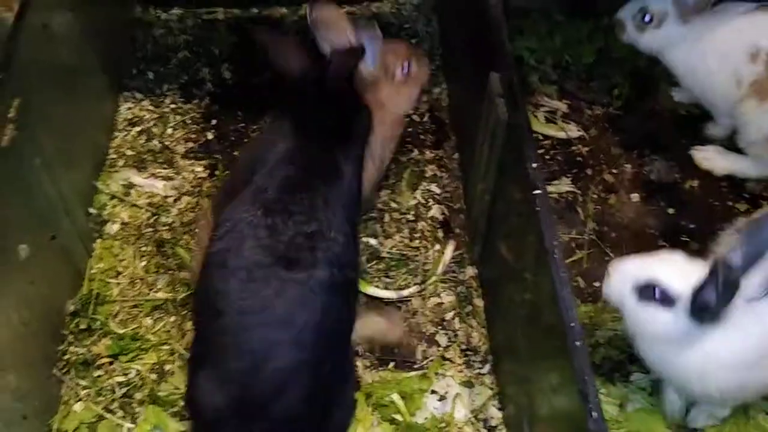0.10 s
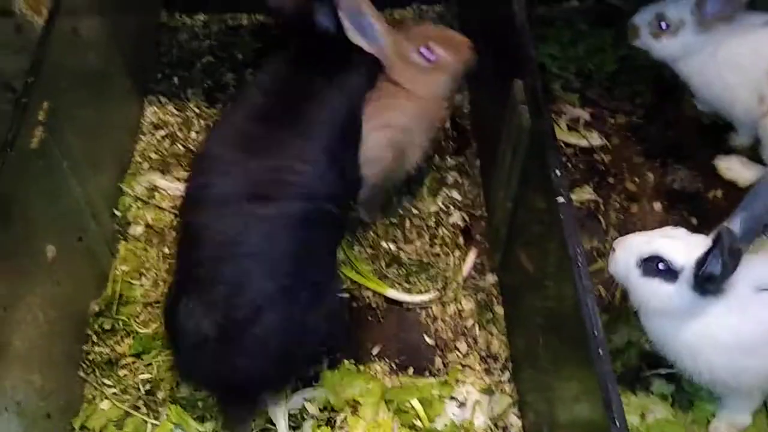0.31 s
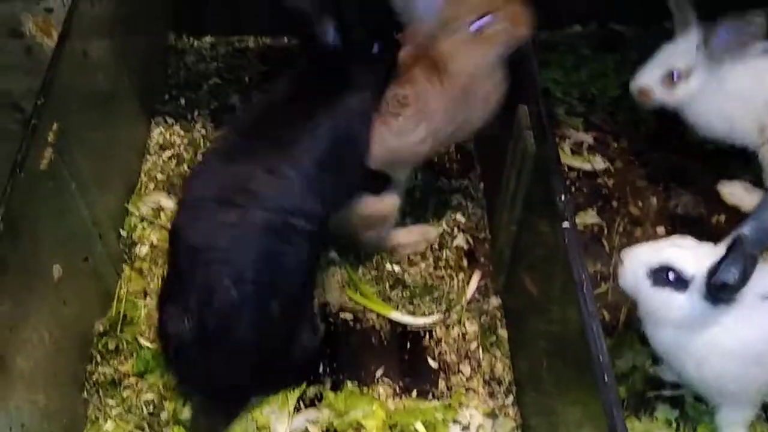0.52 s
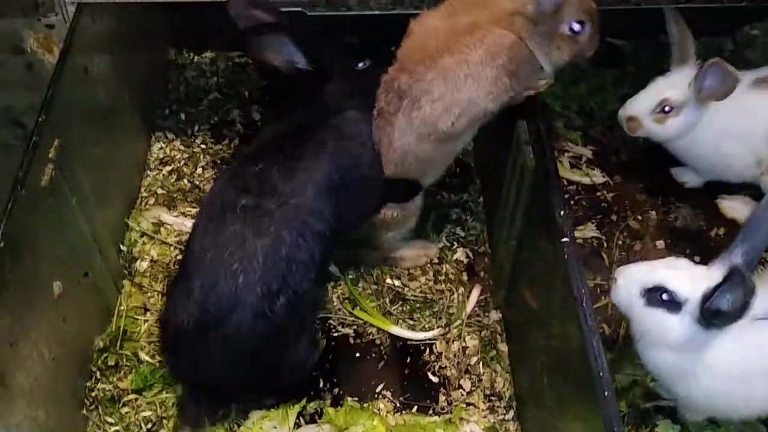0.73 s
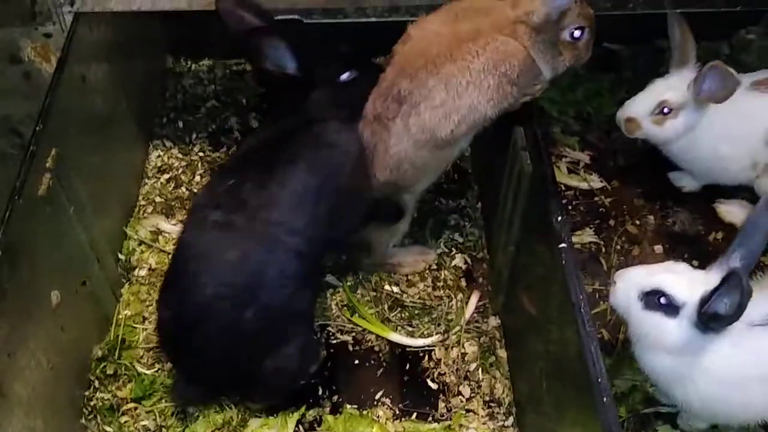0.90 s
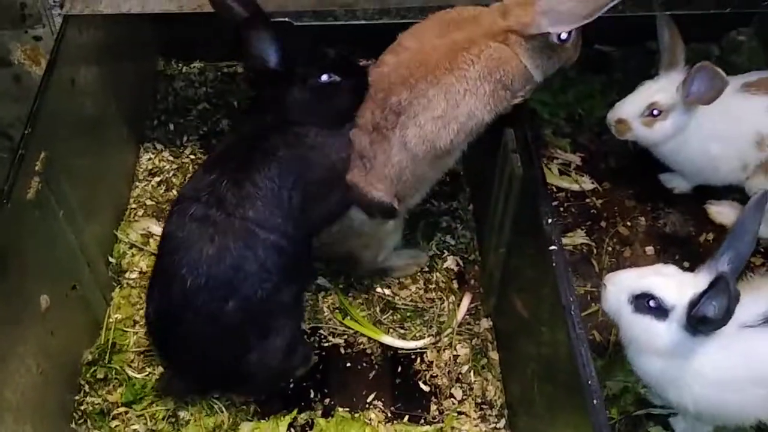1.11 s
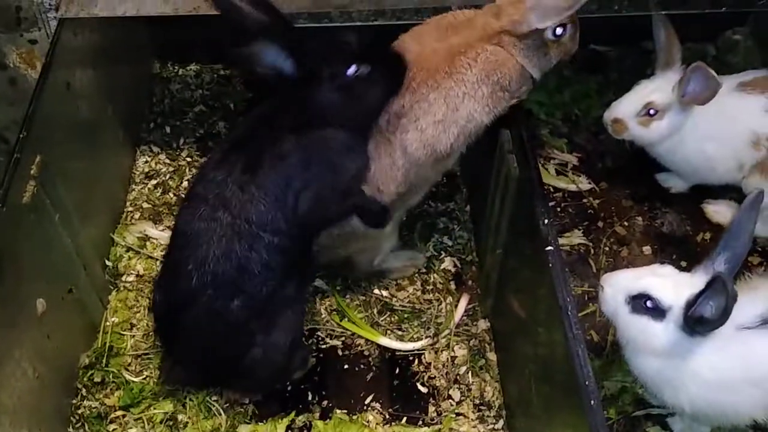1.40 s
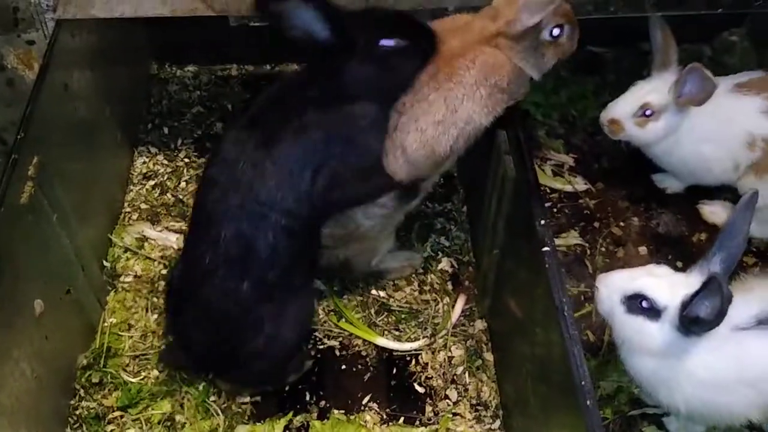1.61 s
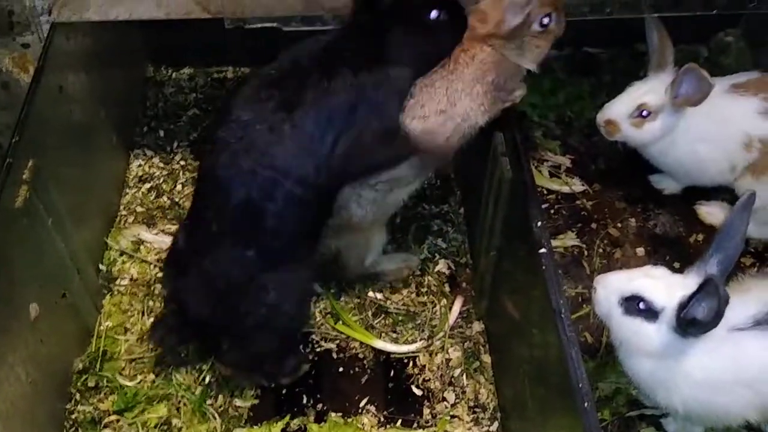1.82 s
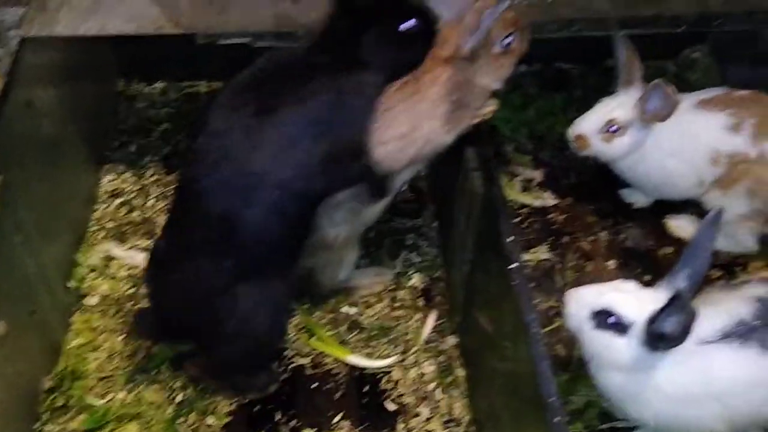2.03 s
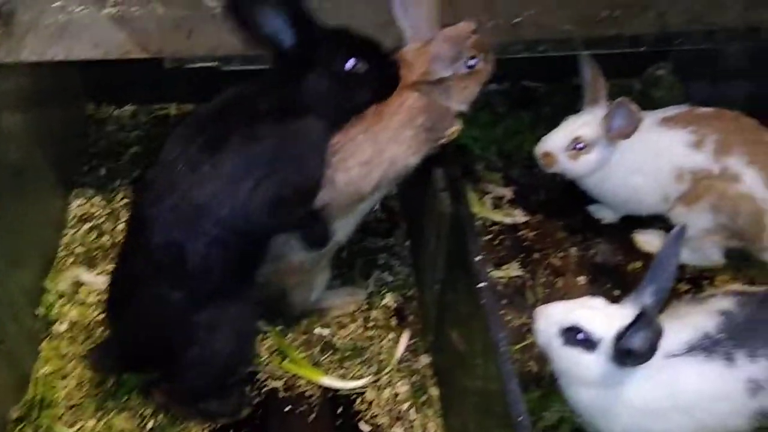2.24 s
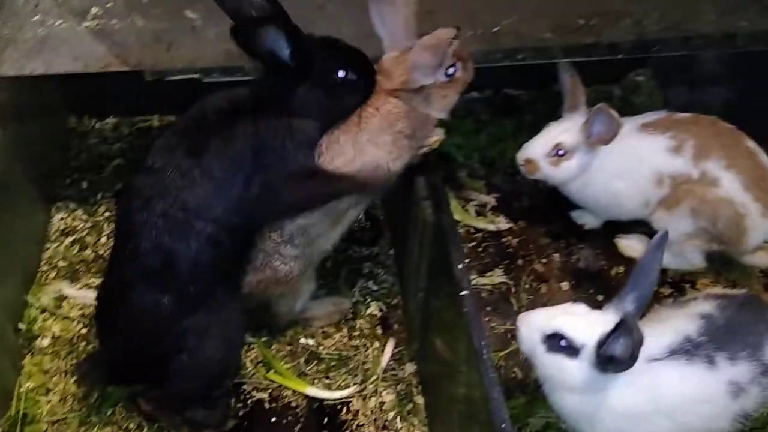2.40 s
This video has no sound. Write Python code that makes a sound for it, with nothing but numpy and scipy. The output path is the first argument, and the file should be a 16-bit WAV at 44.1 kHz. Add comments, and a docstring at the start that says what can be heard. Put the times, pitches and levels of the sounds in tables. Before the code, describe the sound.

Close up in a small wooden shed, rabbit paws thump on hollow boards and scrabble through dry shavings, fade to a quiet low rumble, then a sudden bright crack with short echoes, followed by a dull thump.

```python
"""A wooden hutch inside a small shed, where rabbits shift about.
Their paws thump on the hollow floor, which rings as a set of modes, and scuff through wood shavings,
made of random grains; claws tick on the boards. After a still second something snaps sharply on the
left, perhaps a claw slipping off a board, and a paw lands. The snap is a noise burst with echoes and
ringing. Low rumble, a sinking hush and faint narrow resonances, all filtered noise, lie underneath."""
import sys
import numpy as np
from scipy import signal
from scipy.io import wavfile

SR = 44100
rng = np.random.default_rng(int(sys.argv[2]) if len(sys.argv) > 2 else 0)


def wrap_up_sound(samples):
    """Save the sound to the file named by the first command line argument, as 16-bit audio."""
    columns = np.atleast_2d(samples).T
    # keep every value between -1 and 1, then stretch to whole-number steps
    tamed = np.clip(columns, -1, 1)
    steps = np.round(tamed * 32767).astype(np.int16)
    wavfile.write(sys.argv[1], SR, steps)


N = 114660  # samples, 2.6 s
SNAP_S = 2.1073

# how far the sound leans to the left at each pitch: (pitch_hz, left_minus_right_db)
LEFT_LEAN = [(100, 1.96), (300, -8.5), (1000, 0.5), (2500, -2.5), (5500, 4.5), (10000, 8), (15000, 11)]


def from_db(db):
    """Decibels to gain."""
    return 10 ** (np.asarray(db) / 20)


def rms_one(x):
    """Scale to unit rms over all channels together."""
    return x / np.sqrt(np.mean(x ** 2) + 1e-20)


def energy_one(x):
    """Scale to an energy of one per channel, averaged over the channels."""
    return rms_one(x) / np.sqrt(x.shape[-1])


def at_hz(points, hz):
    """Read a table between its points, on a log-frequency axis."""
    table_hz, values = np.transpose(points)
    return np.interp(np.log(hz), np.log(table_hz), values)


def pan(db):
    """Left and right gains of constant power; positive dB leans left."""
    return rms_one(from_db(np.array([[db], [-db]]) / 2))


def clicks(times, gains):
    """A track of single impulses."""
    out = np.zeros(N)
    places = np.clip(np.asarray(times) * SR, 0, N - 1).astype(int)
    np.add.at(out, places, gains)
    return out


def through(x, response):
    """Play a track through a stereo response."""
    return signal.fftconvolve(np.atleast_2d(x), response, axes=1)[:, :N]


def band_filter(hz, width_hz):
    """A filter that passes a narrow band around one pitch."""
    edges = [hz - width_hz / 2, hz + width_hz / 2]
    return signal.butter(2, edges, "band", fs=SR, output="sos")


def ring(x, hz, t60):
    """One mode: a unit click sets a sine of height 1 ringing, which falls 60 dB in t60 seconds."""
    shrink = from_db(-60 / (t60 * SR))  # per sample
    turn = 2 * np.pi * hz / SR  # radians per sample
    return signal.lfilter([0, np.sin(turn)], [1, -2 * shrink * np.cos(turn), shrink * shrink], x + 1e-18)


def noise_bands(size):
    """Stereo noise in narrow bands, much alike left and right in the bass and unrelated at the top."""
    # likeness of the two channels, 1 = the same: (pitch_hz, likeness)
    likeness = [(30, .93), (150, 0.92), (350, .88), (700, 0.37), (1300, -0.14), (2800, -0.15), (6000, 0),
                (15000, 0)]
    edges = np.geomspace(18, 17000, 31)
    white = rng.standard_normal((2, 2, size + SR // 2))
    for k, (low, high) in enumerate(zip(edges, edges[1:])):
        band = signal.butter(2, [low, high], "band", fs=SR, output="sos")
        # the first half second is dropped while the filter settles
        mid, side = signal.sosfilt(band, white[k % 2])[:, -size:]
        hz = np.sqrt(low * high)
        alike = np.clip(at_hz(likeness, hz), -.99, .99)
        yield hz, np.sqrt(1 + alike) * mid + np.sqrt(1 - alike) * side * [[1], [-1]]


def steady(spectrum):
    """Coloured stereo noise of unit rms, summed from weighted bands."""
    return rms_one(sum(from_db(at_hz(spectrum, hz)) * band for hz, band in noise_bands(size=N)))


def shed(spectrum, lean):
    """The shed's answer to a click of this colour: dense echoes that die fast, plus a weak late tail."""
    # time to fall by 60 dB: (pitch_hz, t60_s)
    shed_t60 = [(100, 0.53), (500, 0.68), (1100, .3), (2200, 0.24), (6000, 0.15), (11000, .17),
                (15000, 0.27)]
    build_s, late_db, late_t60_s = 0.002, -26, 0.52
    t = np.arange(SR // 2) / SR
    out = 0
    for hz, band in noise_bands(size=len(t)):
        early = from_db(-60 * t / at_hz(shed_t60, hz))
        late = from_db(late_db - 60 * t / late_t60_s)
        out = out + from_db(at_hz(spectrum, hz)) * pan(at_hz(lean, hz)) * band * (early + late)
    return energy_one(out * (1 - np.exp(-t / build_s)))


def crack(spectrum, lean_db):
    """The direct sound of one tiny fracture, arriving from the left; too small to make bass."""
    fall_s, low_cut_hz = .0006, 1800
    t = np.arange(SR // 20) / SR
    noise = sum(from_db(at_hz(spectrum, hz)) * band for hz, band in noise_bands(size=len(t)))
    burst = noise * np.exp(-t / fall_s)
    burst = signal.sosfilt(signal.butter(2, low_cut_hz, "high", fs=SR, output="sos"), burst)
    return np.array([energy_one(side) for side in burst]) * pan(lean_db)


def thumps():
    """Soft paws ring the floor's modes and knock dully on the walls; the small floor gives little deep bass."""
    # paws land; the spot decides which modes answer:
    # (start_s, lowest_mode_db, main_mode_db, upper_modes_db)
    landings = [(0.013, -54, -48, -43), (0.066, -53, -52, -43), (0.195, -46, -32, -31.5),
                (0.2183, -24, -22, -19.5), (0.275, -64, -61, -40), (0.492, -38, -40, -27),
                (0.5077, -37, -26.5, -35), (0.568, -50, -43, -38.5), (0.582, -34, -29, -23),
                (0.597, -61, -27, -26), (0.771, -31, -46.5, -45), (0.803, -31, -52, -44),
                (0.957, -33.5, -38, -42.5), (0.994, -68, -55, -53), (2.1559, -18, -21.5, -28.5),
                (2.187, -29.5, -30.5, -31)]
    # pitches where those three levels apply, in between they blend: pitch_hz
    group_hz = [111, 140, 209]
    # the hutch floor: (pitch_hz, level_db, t60_s)
    floor_modes = [(111.2, -5, 0.51), (139.8, 0, 0.31), (156.4, -7.5, 0.38), (191, -8.5, 0.34),
                   (211.6, -3, 0.18), (219.7, -17.5, 0.34), (302.4, -21.5, 0.044), (358.7, -31.5, 0.39),
                   (467.5, -22, 0.08), (497.4, -20.5, 0.23)]
    # colour of the dull knock of the walls: (pitch_hz, level_db_per_hz)
    knock_colour = [(60, -15), (120, 8), (250, 5.5), (400, -8), (700, -7.5), (1100, 3.5), (1800, -42),
                    (4000, -30.5)]
    knock_db = 11.5  # above the upper modes' level
    paw_soft_hz, floor_low_cut_hz = 454, 140

    start_s, *groups = np.transpose(landings)
    boards = 0
    for k, (hz, db, t60) in enumerate(floor_modes):
        strengths = [at_hz(list(zip(group_hz, row)), hz) for row in np.transpose(groups)]
        sign = (-1) ** (k // 2)  # the modes do not all push the same way
        boards = boards + sign * ring(clicks(start_s, from_db(np.add(strengths, db))), hz, t60)
    knock = through(clicks(start_s, from_db(groups[-1] + knock_db)), shed(knock_colour, LEFT_LEAN))
    soft = signal.butter(2, paw_soft_hz, fs=SR, output="sos")
    thin = signal.butter(2, floor_low_cut_hz, "high", fs=SR, output="sos")
    return signal.sosfilt(np.vstack([soft, thin]), boards * pan(LEFT_LEAN[0][1]) + knock)


def grains():
    """A random stream of breaking and slipping shavings: clicks of random size and sign."""
    grains_per_s, spread_db = 3200, 4.0
    sizes = from_db(spread_db * np.minimum(rng.exponential(1, N), 4))
    signs = rng.choice([-1, 1], N)
    return sizes * signs * (rng.random(N) < grains_per_s / SR)


def scuffs():
    """Each push swells and fades: bright grains from the shavings, duller ones from the boards beneath."""
    # paws push through the shavings: (start_s, rise_s, crackle_db, rub_on_the_boards_db)
    pushes = [(0.0, 0.0037, -56.5, -43.5), (0.017, 0.0093, -61, -54), (0.057, 0.0042, -55, -64),
              (0.10, 0.036, -71, -70), (0.162, 0.0021, -57, -79), (0.186, 0.0073, -52, -44.5),
              (0.209, 0.002, -65, -42.5), (0.238, 0.0081, -57, -51), (0.275, 0.0094, -50.5, -45.5),
              (0.302, 0.02, -57.5, -81), (0.356, 0.0019, -42.5, -63), (0.384, 0.0021, -58, -43.5),
              (0.409, 0.017, -60.5, -57), (0.447, 0.0056, -57, -45.5), (0.479, 0.0017, -37, -39),
              (0.512, 0.024, -67, -67), (0.5717, .0008, -45.5, -80), (0.586, 0.0055, -65, -46.5),
              (0.619, 0.01, -64.5, -69), (0.658, 0.011, -68, -60), (0.726, 0.013, -64, -90),
              (0.775, 0.0065, -67.5, -62.5), (0.83, 0.036, -77.5, -92), (0.917, 0.0027, -57.5, -69),
              (0.943, 0.0045, -55, -56.5), (0.981, 0.017, -73.5, -86)]
    # colour of the crackling shavings: (pitch_hz, level_db_per_hz)
    crackle_colour = [(500, -21), (1500, -4), (3000, -4.5), (5500, -4.5), (8800, -1), (12000, 0.5),
                      (15000, -9)]
    # colour of the rub on the boards: (pitch_hz, level_db_per_hz)
    rub_colour = [(150, 14), (400, -24), (750, -4), (1250, 1), (2100, -8.5), (3200, -11.5), (6000, -12.5),
                  (15000, -49)]
    direct_db, direct_lean_db = -4, 2.5

    t = np.arange(N) / SR
    shavings, boards = grains(), grains()
    crackle, rub = 0, 0
    for start_s, rise_s, crackle_db, rub_db in pushes:
        age = np.maximum(t - start_s, 0) / rise_s
        push = age * np.exp(1 - age)  # peaks at 1 after the rise time
        size = np.linalg.norm(push)  # longer pushes carry more energy
        crackle = crackle + from_db(crackle_db) * size * energy_one(shavings * push)
        rub = rub + from_db(rub_db) * size * energy_one(boards * push)
    direct = from_db(direct_db) * through(crackle, crack(crackle_colour, direct_lean_db))
    echoes = through(crackle, shed(crackle_colour, LEFT_LEAN))
    return direct + echoes + through(rub, shed(rub_colour, LEFT_LEAN))


def snap():
    """One hard snap: the crack and its near echoes, the shed's answer, and thin ringing."""
    # the snap and its nearest echoes off the boards: (delay_s, level_db)
    paths = [(0.0003, 0), (.0018, -4), (.0026, -2), (.0075, -6)]
    # colour of the direct crack: (pitch_hz, level_db_per_hz)
    crack_colour = [(1000, -28.5), (3000, -17), (6000, -14), (8300, -6.5), (11000, 2), (13000, 2),
                    (15000, -6)]
    # colour of the shed's answer: (pitch_hz, level_db_per_hz)
    body_colour = [(100, -34.5), (450, -15), (800, -20.5), (1100, -8.5), (1450, -7), (2200, 2.5),
                   (3000, -1), (4500, 0.5), (6500, -1.5), (8400, 1), (10800, -1), (13000, -5.5),
                   (15000, -18)]
    # lean of the snap's echoes and ringing: (pitch_hz, left_minus_right_db)
    echo_lean = [(300, 0.5), (1000, -2.5), (2500, 0), (4000, 1), (5800, 5.5), (8400, 6.5), (10500, 7.5),
                 (15000, -0.5)]
    # thin ringing set off by the snap: (pitch_hz, level_db, t60_s)
    thin_rings = [(969, -65, .28), (1414, -65.5, 0.08), (1860, -65.5, .65), (2110, -40, 0.16),
                  (2364, -39, 0.22), (6020, -39.5, 0.2), (6480, -43, .17), (8140, -40.5, .24),
                  (8400, -44.5, .15), (9770, -43.5, .13), (10640, -32, .13), (11300, -37, .13)]
    direct_db, direct_lean_db, ring_delay_s = -4, 14, .01

    delay_s, path_db = np.transpose(paths)
    arrivals = energy_one(clicks(SNAP_S + delay_s, from_db(path_db)))
    direct = from_db(direct_db) * through(arrivals, crack(crack_colour, direct_lean_db))
    hit = clicks([SNAP_S], 0.85 * from_db(2))
    answer = through(hit, shed(body_colour, echo_lean))
    rings = 0
    for hz, db, t60 in thin_rings:
        starts = SNAP_S + rng.uniform(0, ring_delay_s, 2)  # one for each ear
        pair = np.array([ring(clicks([s], 1), hz, t60) for s in starts])
        rings = rings + from_db(db) * pan(at_hz(echo_lean, hz)) * pair
    return direct + answer + rings


def cluster():
    """Many close modes beat as they die away after the snap: a narrow band of noise that fades."""
    hz, width_hz, level_db, t60_s = 1125, 90, -52, .56
    age = np.arange(N) / SR - SNAP_S
    fade = (age > 0) * from_db(-60 * np.maximum(age, 0) / t60_s)
    hum = rms_one(signal.sosfilt(band_filter(hz, width_hz), rng.standard_normal((2, N))))
    return from_db(level_db) * fade * hum


def taps():
    """Claws tick on a wall board; each mode reaches the two ears at slightly different moments."""
    # claws catch on the boards: (start_s, level_db)
    catches = [(0.215, -53), (0.290, -63), (0.3855, -46), (0.390, -50.5), (0.582, -60.5)]
    # a wall board: (pitch_hz, level_db, t60_s)
    board_modes = [(530, -6, .1), (750, 0, .13), (1020, -3, .09), (1280, 0, .08), (1700, -2, .07),
                   (2100, 0, .07), (2400, -3, .06)]
    start_s, tap_db = np.transpose(catches)
    out = 0
    for hz, mode_db, t60 in board_modes:
        lags = rng.random(2) / hz  # up to one cycle late
        gains = from_db(tap_db + mode_db)
        out = out + np.array([ring(clicks(start_s + lag, gains), hz, t60) for lag in lags])
    return out


def background():
    """Filtered noise: low rumble, a hush that sinks, and faint narrow resonances that come and go."""
    # colour of the rumble: (pitch_hz, level_db_per_hz)
    rumble_colour = [(20, -0.5), (40, -1.5), (65, 0.5), (95, -4.5), (140, -3), (210, -11.5), (300, -20),
                     (500, -32), (800, -71), (1300, -41), (2200, -46), (5000, -50.5), (15000, -51)]
    # a faint midrange hush that sinks in level over time: (time_s, level_db)
    hush_level = [(0, -58), (.8, -61.5), (1.1, -64), (1.3, -72.5), (1.55, -70), (1.75, -88.5), (2.4, -90.5),
                  (2.6, -84)]
    # colour of the hush: (pitch_hz, level_db_per_hz)
    hush_colour = [(100, 9), (300, 6.5), (500, 1), (800, -10), (1200, -11), (1600, -16.5), (2400, -14),
                   (3500, -36.5), (15000, -31.5)]
    # faint narrow resonances: (middle_s, length_s, pitch_hz, level_db)
    sings = [(0.795, 0.082, 1223, -68.5), (1.012, 0.28, 1530, -77.5), (1.252, 0.079, 1134, -77),
             (1.247, 0.28, 1490, -83.5), (1.256, 0.17, 2470, -87.5), (1.439, 0.051, 1510, -77.5),
             (1.548, 0.15, 1540, -81), (1.632, .11, 1140, -81.5), (2.021, 0.027, 1220, -74.5),
             (1.15, 0.17, 532, -72.5), (2.057, 0.093, 499, -75), (2.577, 0.089, 387, -74)]
    rumble_db, rumble_lean_db, sing_width_hz = -56.5, 1.1, 120

    t = np.arange(N) / SR
    rumble = from_db(rumble_db) * steady(rumble_colour) * pan(rumble_lean_db)
    hush = from_db(np.interp(t, *np.transpose(hush_level))) * steady(hush_colour)
    out = rumble + hush
    for middle_s, length_s, hz, db in sings:
        swell = np.exp(-(2 * (t - middle_s) / length_s) ** 2)
        tone = rms_one(signal.sosfilt(band_filter(hz, sing_width_hz), rng.standard_normal((2, N))))
        out = out + from_db(db) * swell * tone
    return out


def scene():
    """Everything in the hutch, over the background."""
    return thumps() + scuffs() + snap() + cluster() + taps() + background()


def record(dry):
    """The top is cut steeply."""
    cutoff_hz = 15700
    return signal.sosfilt(signal.ellip(10, .2, 70, cutoff_hz, fs=SR, output="sos"), dry)


dry = scene()
out = record(dry)
wrap_up_sound(out)
```